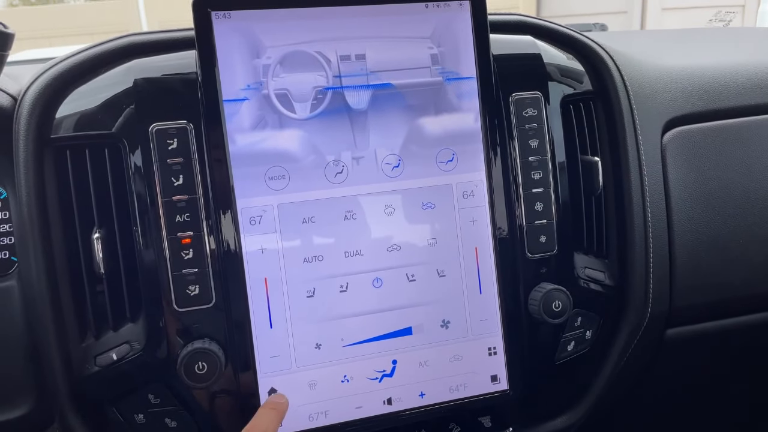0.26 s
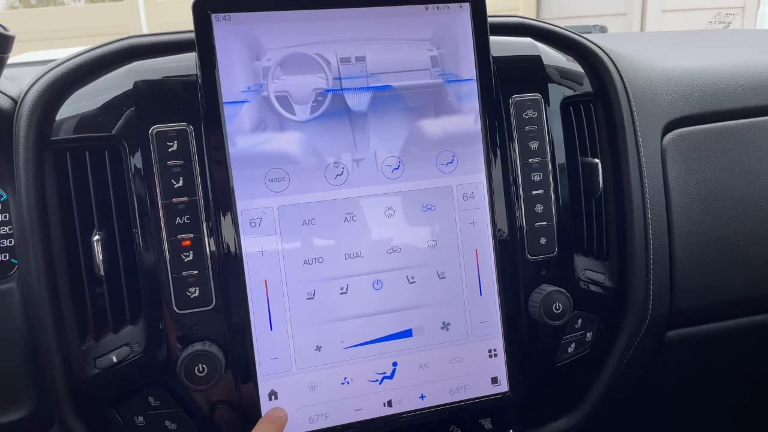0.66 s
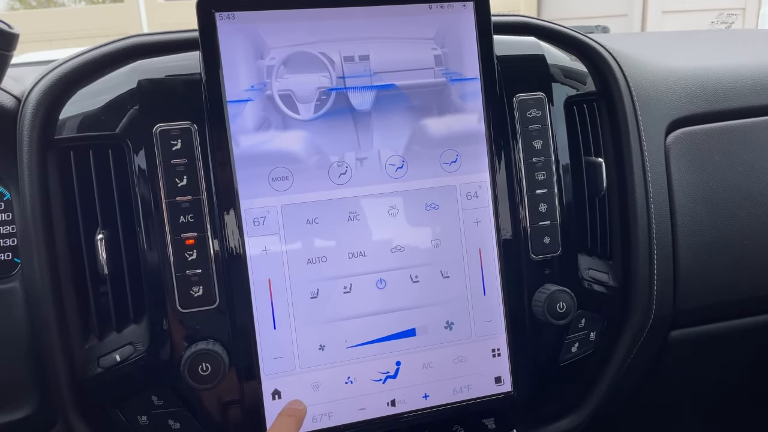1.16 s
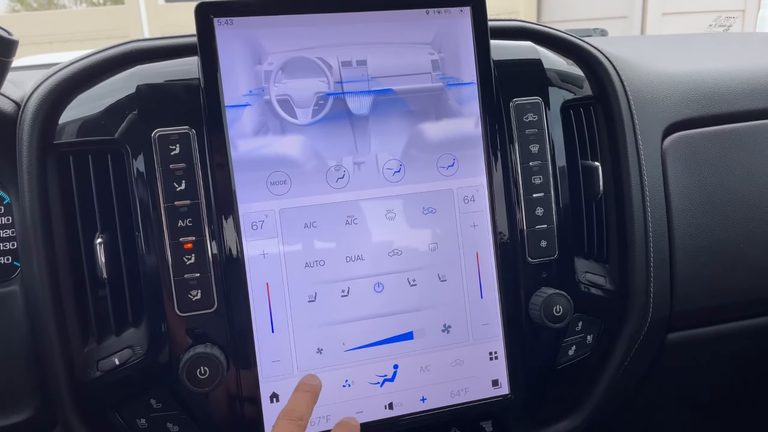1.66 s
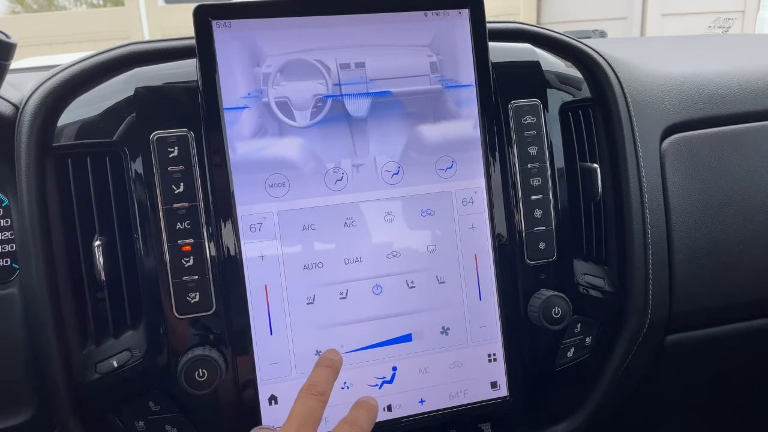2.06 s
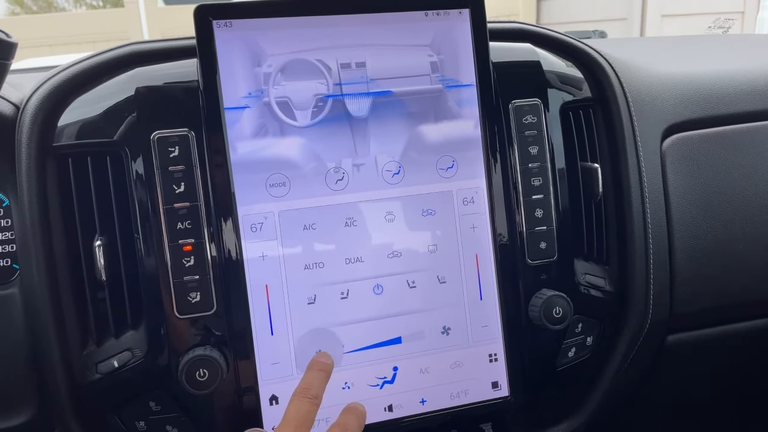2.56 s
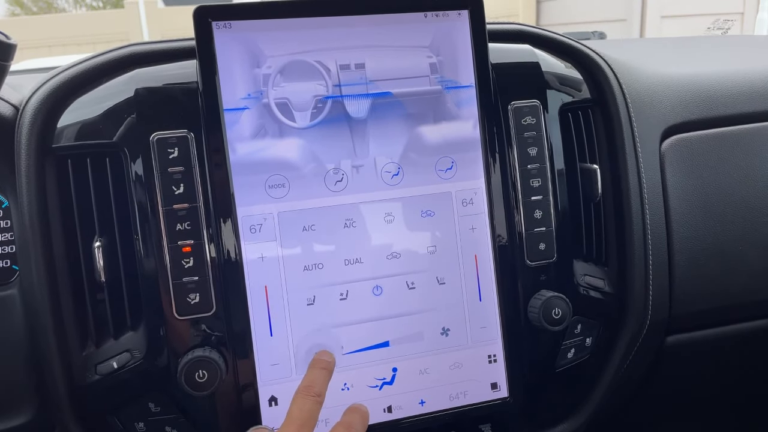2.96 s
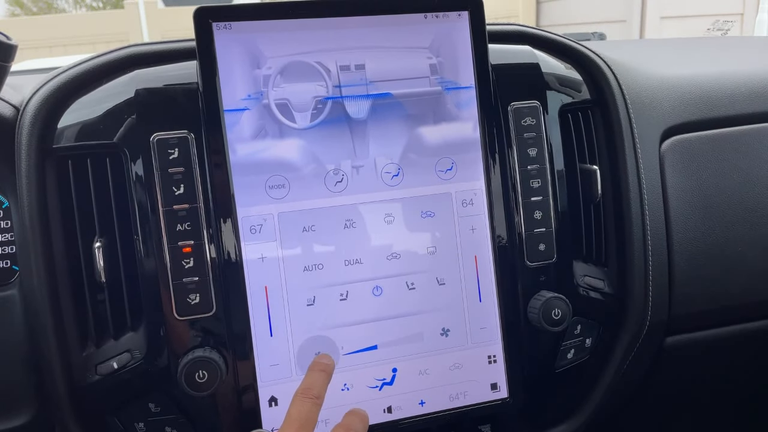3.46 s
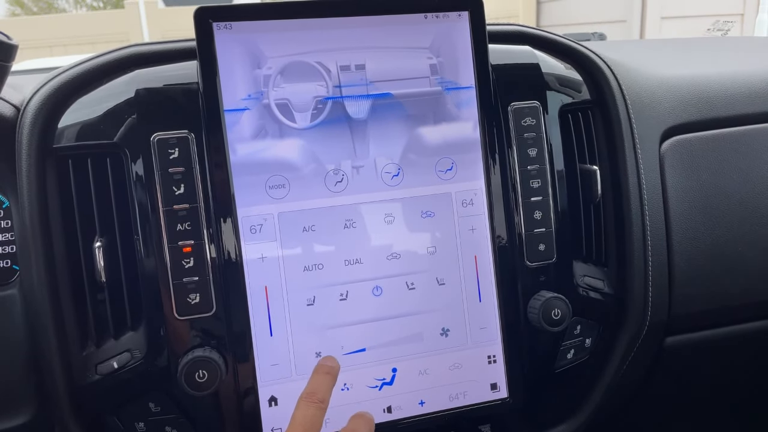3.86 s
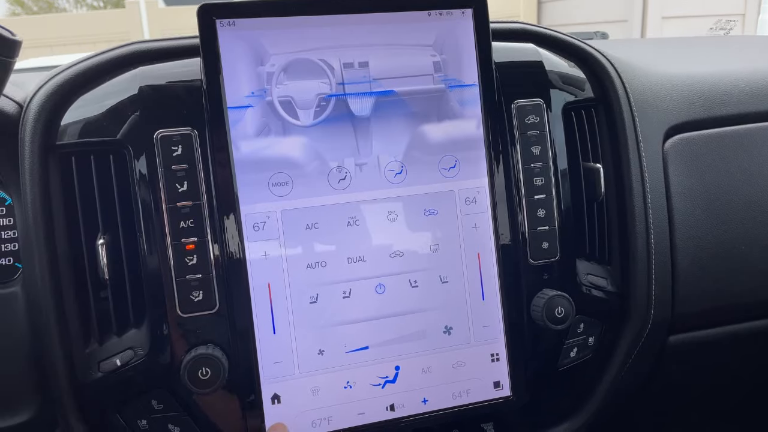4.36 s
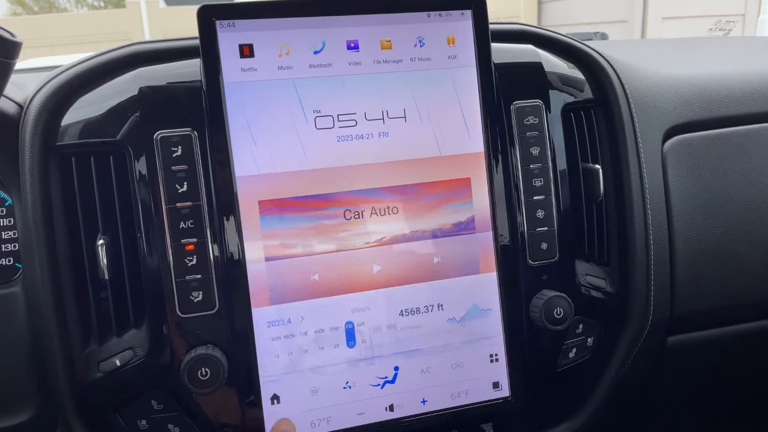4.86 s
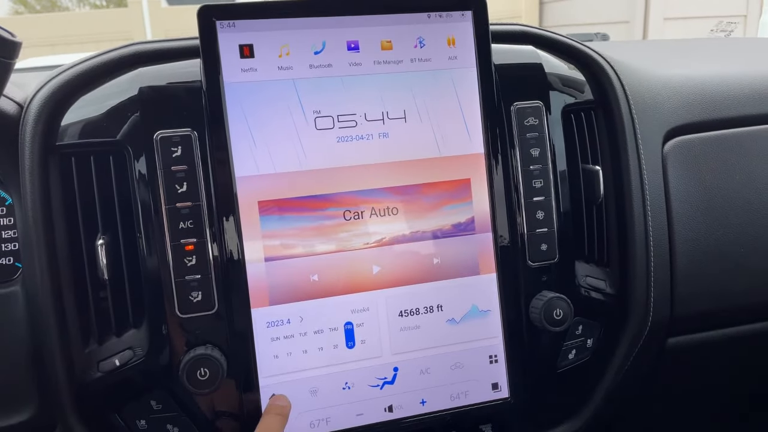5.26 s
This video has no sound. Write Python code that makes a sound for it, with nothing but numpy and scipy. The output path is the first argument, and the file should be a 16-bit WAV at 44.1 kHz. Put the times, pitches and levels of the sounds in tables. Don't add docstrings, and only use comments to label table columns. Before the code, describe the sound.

Rushing vent air rises and sinks over a deep, booming engine idle, a faint motor whine gliding along, then a tiny click near five seconds.

```python
import sys
import numpy as np
from scipy import signal
from scipy.fft import rfft, irfft, next_fast_len
from scipy.io import wavfile
from scipy.ndimage import uniform_filter1d, map_coordinates

SR = 44100
rng = np.random.default_rng(int(sys.argv[2]) if len(sys.argv) > 2 else 0)


def attenuation_scalar(level_db):
    decades = np.asarray(level_db, float) / 20
    return 10 ** decades


def wrap_up_sound(samples):
    columns = np.atleast_2d(samples).T
    tamed = np.clip(columns, -1, 1)
    steps = np.round(tamed * 32767).astype(np.int16)
    wavfile.write(sys.argv[1], SR, steps)


N = 243167
HALF = np.array([[.5], [-.5]])


def unit(x):
    return x / np.sqrt(np.mean(x ** 2) + 1e-30)


def along(points, hz):
    f, value = np.transpose(points)
    return np.interp(np.log(hz + 1), np.log(f + 1), value)


def over_time(points, t):
    return np.interp(t, *np.transpose(points))


def bumps(modes, hz):
    return sum(db / (1 + (2 * (hz - centre) / width) ** 2) for centre, width, db in modes)


def wobble(rate):
    knots = rng.standard_normal(int(N * rate / SR) + 4)
    return map_coordinates(knots, [np.arange(N) * rate / SR])


def coloured(x, level_db, **ends):
    edge = 4096
    channels = [(0, 0)] * (np.ndim(x) - 1)
    wide = np.pad(x, channels + [(edge, edge)], **(ends or dict(mode="wrap")))
    m = next_fast_len(N + 3 * edge)
    gain = attenuation_scalar(level_db(np.fft.rfftfreq(m, 1 / SR)))
    return irfft(rfft(wide, m) * gain, m)[..., edge:edge + N]


def noise(level_db):
    return unit(coloured(rng.standard_normal(N), level_db))


def ports(mid, side):
    return np.array([mid + side, mid - side])


# t/s, level/dB below full flow
FLOW = [
    (0, -8.5),
    (1.199, -4.5),
    (2.4, -1.5),
    (3, -0.5),
    (3.6, -0.5),
    (4.2, -0.5),
    (4.7, -2),
    (5.51, -4.5),
]
# f/Hz, level/dB per Hz
AIR_MID = [(100, -100), (150, -65), (250, -70), (400, -76.5), (550, -76), (640, -85), (1000, -87.5),
           (1400, -89.5), (2100, -89), (2500, -96), (3500, -101), (4400, -108), (5600, -115),
           (9000, -119.5)]
# f/Hz, level/dB per Hz
AIR_SIDE = [(30, -105), (60, -72.5), (150, -72.5), (270, -83), (600, -82.5), (1000, -87.5), (1500, -89),
            (2100, -91), (2400, -99), (3300, -103), (4200, -110), (5500, -115), (7500, -122), (9000, -126)]
# f/Hz, gain/dB per dB of flow
FOLLOW = [(100, 0.56), (250, 0.72), (600, 0.81), (2000, 1.095), (4000, 1.36), (5000, 1.6), (9000, 2.24)]
# f/Hz, width/Hz, level/dB
DUCT_MID = [(160, 4.6, -5.5), (236, 18, -0.5), (550, 37, 0.5), (595, 94, -4.5), (643, 31, 6), (710, 30, 0),
            (761, 38, 4.5), (912, 65, 5.5), (1177, 30, -6), (1298, 30, 4), (1467, 47, -5), (1605, 110, 4),
            (1680, 75, -5), (1745, 45, 6.5), (1821, 65, -7.5), (1977, 42, 7.5), (2117, 30, 7.5),
            (2350, 130, 3), (2782, 38, 4.5), (2848, 36, -11), (2915, 53, 5), (3460, 120, -2), (3600, 90, 6),
            (3780, 79, 3.5), (4360, 60, 4), (4380, 55, -4), (4680, 130, 5.5), (4897, 62, 10),
            (5220, 220, 4), (8400, 700, 1.5)]
# f/Hz, width/Hz, level/dB
DUCT_SIDE = [(149, 30, 1), (296, 30, 0.5), (560, 38, -2), (725, 68, -2), (840, 150, 3.5), (945, 56, 1),
             (1430, 100, 6), (1540, 46, 2.5), (1800, 110, 2), (1820, 74, -2.5), (1990, 37, -2),
             (2230, 49, 4.5), (2580, 64, 5.5), (3160, 80, 5.5), (3620, 250, 2.5), (4130, 120, 2),
             (4530, 150, 4), (5030, 60, 3.5)]
# f/Hz, quarter-cycle share of the sum in the difference
TWIST = [(200, 0.014), (300, 0.33), (520, -0.11), (800, 0.93), (1100, 0.47), (1400, 0.05), (1650, 0.011),
         (1800, 0.43), (2100, -0.91), (2450, -0.18), (2800, 0.14), (3300, 0.5), (4500, .3), (7000, -0.05)]
# f/Hz, left-right level/dB
LEAN = [(60, 1), (150, -1.5), (220, 3), (500, 3.5), (900, 1), (1700, -0.1), (2300, -1), (4500, 2),
        (8000, 0)]


def air(patchy_db=0.7):
    white = rng.standard_normal((2, N)) * np.sqrt(SR / 2)
    hz, t, z = signal.stft(white, SR, nperseg=1024)
    patches = uniform_filter1d(rng.standard_normal(z.shape[1:]), size=12, axis=0)
    patches = unit(uniform_filter1d(patches, size=8, axis=1))
    z = z * attenuation_scalar(np.outer(along(FOLLOW, hz), over_time(FLOW, t)) + patchy_db * patches)
    twist = np.clip(along(TWIST, hz), -.9, .9)[:, None]
    z[1] = np.sqrt(1 - twist ** 2) * z[1] + 1j * twist * z[0]
    eddies = signal.istft(z, SR, nperseg=1024)[1][:, :N]

    def fade(f):
        vent_top = -12 * np.log2(np.maximum(f / 8750, 1))
        return vent_top - 60 * np.log2(np.maximum(f / 12500, 1))

    mid = coloured(eddies[0], lambda f: along(AIR_MID, f) + bumps(DUCT_MID, f) + fade(f))
    side = coloured(eddies[1], lambda f: along(AIR_SIDE, f) + bumps(DUCT_SIDE, f) + fade(f))
    lean = lambda f: HALF * along(LEAN, f)
    return coloured(ports(mid, side), lean, mode="reflect", reflect_type="odd")


# t/s, f/Hz
SPEED = [(0, 418), (.5, 444), (1, 470), (1.7, 503.5), (2, 516.5), (2.35, 530.5), (2.7, 540.5), (3, 548.5),
         (3.5, 555), (3.8, 552.5), (4.1, 547), (4.5, 532), (5, 509), (5.3, 494.5), (5.51, 484)]
# f/Hz, level/dB rms, left-right level/dB
HOUSING = [(420, -69, -1), (465, -67, -2), (495, -71, 6), (508, -64.5, 8), (520, -63, 8), (535, -64.5, 8),
           (544, -61.5, 8), (549, -67, 8), (556, -71, 8)]


def motor():
    hz = uniform_filter1d(over_time(SPEED, np.arange(N) / SR), size=SR // 5)
    at, db, pan_db = np.transpose(HOUSING)
    level_db = np.interp(hz, at, db) + HALF * np.interp(hz, at, pan_db) + 2.4 * wobble(7)
    phase = 2 * np.pi * np.cumsum(hz + .6 * wobble(9)) / SR
    right_lead = .6
    whine = np.sqrt(2) * attenuation_scalar(level_db) * np.sin(phase - HALF * right_lead)
    whistle_hz, width_hz = 1740, 14
    narrow = lambda f: -20 * np.log10(1 + (2 * (f - whistle_hz) / width_hz) ** 2)
    whistle_db = -67.5 + .45 * (hz - hz.max())
    return whine + noise(narrow) * attenuation_scalar(whistle_db)


# f/Hz, level/dB per Hz
BOOM = [(20, -56.5), (26, -29.5), (34, -25.5), (47, -8), (56, 0), (68, 0.5), (84, 2.5), (105, -1), (126, 2),
        (133, -5), (142, -17), (200, -89.5)]
# t/s, level/dB rms
SURGE = [(0, -38.5), (.35, -36.5), (.65, -36), (.85, -38.5), (1.1, -36), (1.4, -36), (1.8, -38.5),
         (2, -34.5), (2.3, -35.5), (2.7, -38), (3, -35), (3.4, -34), (3.75, -35.5), (3.97, -39.5),
         (4.1, -36), (4.5, -36.5), (4.85, -38.5), (5.51, -35.5)]


def boom():
    t = np.arange(N) / SR
    body = noise(lambda f: along(BOOM, f))
    split_hz = 95
    upper = coloured(body, lambda f: -20 * np.log10(1 + (split_hz / (f + 1)) ** 8))
    swell_db = 0.56 * (over_time(FLOW, t) + 4) + 1.3 * wobble(2.1)
    body = body + upper * (attenuation_scalar(swell_db) - 1)
    return body * attenuation_scalar(-0.75 + over_time(SURGE, t)) * attenuation_scalar(.9 * HALF)


# f/Hz, level/dB rms, left-right level/dB
TONES = [
    (40.05, -40.3, .4),
    (80.1, -52, .5),
    (215.7, -57, 2.4),
    (296, -64.5, 1),
    (320.4, -70, 1),
    (400.5, -72, 2),
]


def engine():
    turns = np.cumsum(1 + 0.0015 * wobble(1.15)) / SR
    out = np.zeros((2, N))
    for hz, db, pan_db in TONES:
        tone = np.sqrt(2) * np.sin(2 * np.pi * (hz * turns + rng.random()))
        out += attenuation_scalar(db + 0.44 * wobble(0.63) + HALF * pan_db) * tone
    return out


def strokes(rows, level_db, onset=.1, release=.36):
    t = np.arange(N) / SR
    gate = np.zeros(N)
    for start, length, db in rows:
        edges = np.minimum((t - start) / onset, (start + length - t) / release)
        gate += attenuation_scalar(db) * np.clip(edges / length, 0, 1)
    return gate * noise(level_db)


# t/s, length/s, level/dB rms
SLIDES = [
    (.48, .26, -97),
    (1.42, .3, -96),
    (3.22, .26, -96),
    (4.67, .13, -90),
    (5.11, .2, -97),
]
# t/s, length/s, level/dB rms
BRUSHES = [
    (4.54, .05, -82),
    (4.785, .035, -85),
    (4.968, .058, -67.5),
    (5.045, .025, -83),
]
# f/Hz, level/dB per Hz
BRUSH = [(2000, -24), (4500, -0.5), (8000, 4), (10200, -9), (12500, -11), (16000, -9), (17000, -41)]
# t/s, length/s, level/dB rms
FLICKS = [
    (4.72, .065, -80.5),
    (4.9, .025, -90),
    (4.967, .04, -75),
]
# f/Hz, level/dB per Hz
FLICK = [(9000, -30), (11500, 0), (13000, 0), (16000, 3), (17000, -40)]


def rub():
    squeak_hz, width_hz = 12750, 900
    narrow = lambda f: -6 * np.minimum((2 * (f - squeak_hz) / width_hz) ** 2, 20)
    squeak = strokes(SLIDES, narrow, onset=.4, release=.45)
    wipe = lambda: strokes(BRUSHES, lambda f: along(BRUSH, f))
    wipes = ports(wipe(), attenuation_scalar(-4) * wipe())
    return squeak + wipes + strokes(FLICKS, lambda f: along(FLICK, f))


# t/s, level/dB peak
SNAPS = [
    (4.99, -45.5),
    (4.9999, -44),
]
# f/Hz, level/dB, t60/s
PANEL = [(7050, 3, .003)]
# t/s, f/Hz, t60/s, level/dB peak, left port's lead/radians
PINGS = [
    (4.9822, 6200, .014, -51, .1),
    (4.9906, 3450, .013, -49.5, 1.3),
    (5.0000, 3500, .009, -51, 2.1),
    (5.0000, 5700, .006, -55, 2.2),
    (5.0004, 4700, .014, -58, .4),
    (5.0838, 6900, .006, -54, .8),
    (5.088, 7100, .08, -79, 0),
]
# f/Hz, level/dB per Hz
CRACK = [(1800, -30), (3200, 5), (5000, 3.5), (7500, -7.5), (9500, -14), (16000, -17.5)]


def ticks():
    t = np.arange(N) / SR

    def dying(start, t60):
        since = np.clip(t - start, 0, 1)
        return (t > start) * attenuation_scalar(-60 * since / t60) * (1 - np.exp(-since / .0003))

    rings = PINGS + [(s, hz, t60, db + level_db, 0) for s, db in SNAPS for hz, level_db, t60 in PANEL]
    out = np.zeros((2, N))
    for s, hz, t60, db, lead in rings:
        out += attenuation_scalar(db) * dying(s, t60) * np.sin(2 * np.pi * hz * (t - s) + HALF * lead)
    bursts = [(s, db - 15) for s, db in SNAPS] + [(s, db - 21) for s, hz, t60, db, lead in PINGS]
    fizz = noise(lambda f: along(CRACK, f))
    out += fizz * sum(attenuation_scalar(db) * dying(s, .035) for s, db in bursts)
    return attenuation_scalar(3 * HALF) * out


def scene():
    return air() + motor() + boom() + engine() + rub() + ticks()


# f/Hz, level/dB per Hz
HISS = [(300, -12.5), (3000, -2.5), (7000, -5), (10000, -3), (12500, 0), (16000, -7.5)]


def microphone_hiss():
    hiss = unit(coloured(rng.standard_normal((2, N)), lambda f: along(HISS, f))) * attenuation_scalar(1.7 * wobble(23))
    return ports(attenuation_scalar(-90.5) * hiss[0], attenuation_scalar(-95.0) * hiss[1])


def band_limit(x):
    return signal.sosfilt(signal.butter(12, 15750, fs=SR, output="sos"), x)


# f/Hz, level/dB
TREBLE_TOP = [(12900, 0.5), (13200, -3.5), (13800, 0), (14400, -3), (14700, -12), (16000, -11.5)]


def record(dry):
    heard = coloured(dry + microphone_hiss(), lambda f: along(TREBLE_TOP, f), mode="reflect", reflect_type="odd")
    from_end = np.arange(N)[::-1] / SR
    mix = heard * (1 - .7 * np.cos(np.pi / 2 * np.minimum(from_end / .004, 1)) ** 2)
    return band_limit(mix)


dry = scene()
out = record(dry)
wrap_up_sound(out)
```